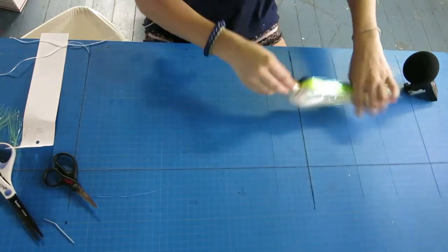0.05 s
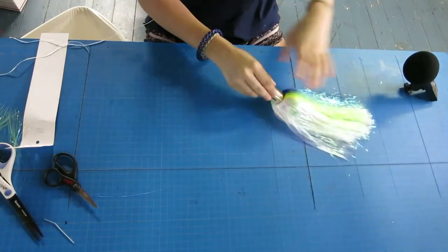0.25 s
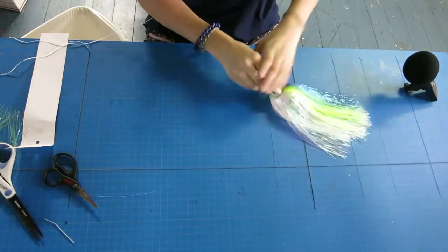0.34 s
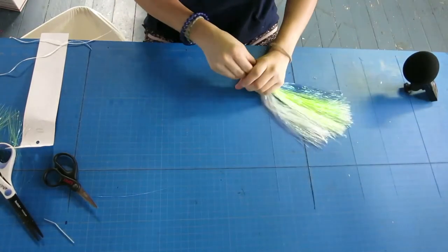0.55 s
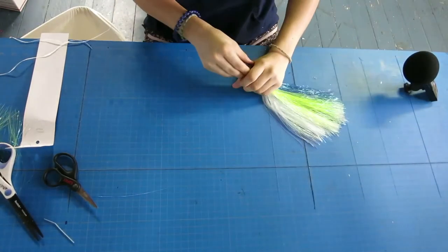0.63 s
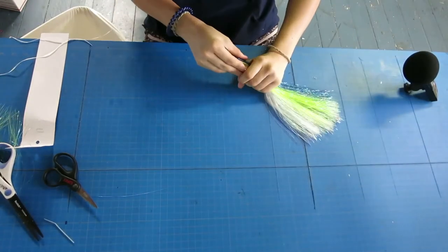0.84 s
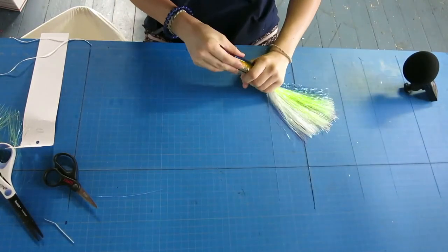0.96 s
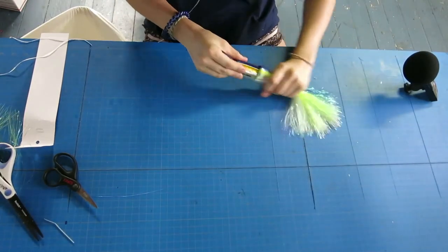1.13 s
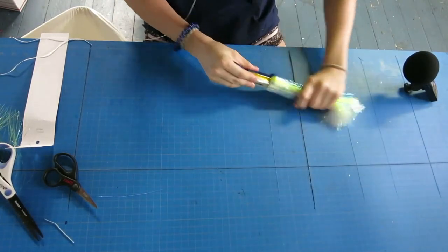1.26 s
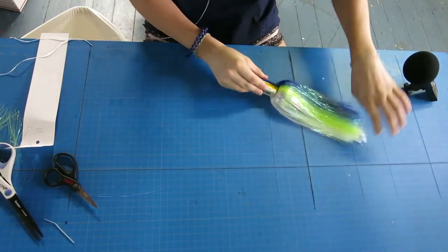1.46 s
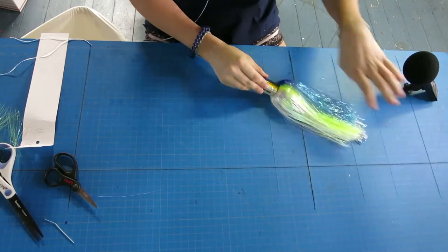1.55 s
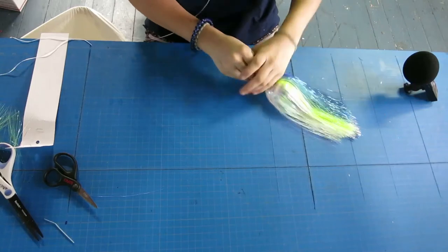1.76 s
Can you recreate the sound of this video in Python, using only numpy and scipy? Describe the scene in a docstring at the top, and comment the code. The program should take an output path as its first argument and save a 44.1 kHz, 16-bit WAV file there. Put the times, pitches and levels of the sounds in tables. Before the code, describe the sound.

Tinsel rustling softly in the hands, with one thump on a table early on.

```python
"""Over the hum of a quiet room, a bundle of tinsel hisses as it is swung down onto a cutting mat.
At 0.2 s the hand lands: the stem clacks and one dull thump excites the normal modes of the table.
The bundle is then stroked, and countless tiny strand contacts add up to hiss and crackle,
while a few ticks snap between the fingers and light knocks ring the table again.
The rustle swells from 1.2 s, and near 1.45 s the bundle flops back onto the mat."""
import sys
import numpy as np
from scipy import signal
from scipy.fft import rfft, irfft
from scipy.io import wavfile

SR = 44100
rng = np.random.default_rng(int(sys.argv[2]) if len(sys.argv) > 2 else 0)


def wav_record(signal):
    """Record a signal, one row per channel, as 16-bit PCM in the file named by sys.argv[1]."""
    frames = np.transpose(np.atleast_2d(signal))
    bounded = np.clip(frames, -1, 1)
    # unit amplitude maps onto the largest positive 16-bit level
    quanta = np.round(bounded * 32767).astype(np.int16)
    wavfile.write(sys.argv[1], SR, quanta)


N = 79380
T, HZ = np.arange(N) / SR, np.fft.rfftfreq(N, 1 / SR)


def amp(db):
    """Amplitude ratio of a level in decibels."""
    return 10 ** (np.asarray(db) / 20)

def unit(x):
    """Normalisation to unit rms."""
    return x / np.sqrt(np.mean(x ** 2) + 1e-20)

def over_hz(points):
    """Interpolation of a spectrum on a logarithmic frequency axis."""
    f, value = np.transpose(points)
    return np.interp(np.log(HZ + 1), np.log(f + 1), value)

def pan(db):
    """Intensity panning: two gains from the left-minus-right level."""
    return amp(np.array([np.atleast_1d(db), -np.atleast_1d(db)]) / 2)

def pair(a, b, correlation):
    """Partial coherence: two independent spectra mix into a correlated pair."""
    c = np.clip(correlation, -1, 1)
    return np.array([a, c * a + np.sqrt(1 - c ** 2) * b])

def ring(start, hz, t60, rise, lag=0):
    """Damped oscillation of one struck mode; the phase lag is in cycles."""
    t = np.maximum(T - start, 0)
    envelope = (1 - np.exp(-t / rise)) * np.exp(-np.log(1000) * t / t60)
    return envelope * np.sin(2 * np.pi * (hz * t - lag))


# air noise spectrum: f/Hz, relative level/dB
AIR_SPECTRUM = [(15, 2), (35, -4.5), (55, 4), (80, -3), (125, -3), (160, -13), (225, -6.5), (290, -14),
                (400, -15.5), (600, -17.5), (850, -22), (1150, -22), (1700, -29.5), (4000, -37.5),
                (8000, -51.5), (16000, -66.5)]
# its balance: f/Hz, left minus right/dB
AIR_BALANCE = [(40, 3), (90, 1.5), (200, -2), (600, -4), (1200, -4.5), (2500, -1), (8000, -0.5)]
# its coherence: f/Hz, left-right correlation/1
AIR_CORRELATION = [(60, -0.087), (130, 0.42), (1400, 0.26), (3100, 0.67), (7000, 0.26), (15000, -0.84)]

def room_tone():
    """Stationary air noise plus a low hum under slow random amplitude and phase modulation."""
    hum_hz = 56.5
    a, b, drift = rfft(rng.standard_normal((3, N)))
    spectra = pair(a, b, over_hz(AIR_CORRELATION)) * amp(over_hz(AIR_SPECTRUM))
    air = unit(irfft(spectra * pan(over_hz(AIR_BALANCE)), N))
    waver = .22 * unit(irfft(drift * np.exp(-(HZ / 5) ** 2), N))
    hum = np.sqrt(2) * (1 + waver) * np.sin(2 * np.pi * hum_hz * T + waver[::-1])
    return amp(-43) * air + hum * amp([[-46], [-54]])

def reverberation(x, db, t60):
    """Convolution with sparse, exponentially decaying room reflections."""
    t, first_delay_s = T[:SR // 3], .0019
    taps = rng.standard_normal((2, len(t))) * (rng.random((2, len(t))) < .05)
    taps *= (t > first_delay_s) * np.exp(-np.log(1000) * t / t60)
    taps /= np.linalg.norm(taps, axis=1, keepdims=True)
    return amp(db) * signal.fftconvolve(x, taps, axes=1)[:, :N]


# normal modes of the table: f/Hz, left level/dB, right level/dB, T60/s, right lag/cycles
TABLE_MODES = [(61.3, -13, -17, 0.35, 0.553), (94, -5.5, -5, 0.11, 0.4), (130.2, -15.5, -8, 0.13, 1),
               (164, -12, -4.5, 0.045, 0.18), (184.7, -12, -8, 0.095, 0.14), (221.7, -8, 4.5, 0.081, 0.12),
               (256, -18.5, -14, 0.14, 0.15), (311, -14, -13.5, 0.11, 0.22),
               (349.4, -22.5, -1.5, 0.046, 0.0053), (395.5, -22.5, -20.5, 0.15, 0.35),
               (476, -18.5, -12, 0.055, .1), (654.4, -24.5, -20.5, .065, 0.16),
               (730, -25.5, -27, 0.06, 0.054), (842, -47, -33, 0.099, 0.69), (974, -49, -41, 0.086, 0.85)]
# blows on the table: t/s, level/dB, spectral roll-off/(dB per octave)
TABLE_BLOWS = [(0.2071, 3, 1.5), (0.756, -36, -7), (.789, -35, -4), (0.949, -30.5, 6.5), (.973, -32, 8.5),
               (1.451, -25, 2.5), (1.462, -25.5, -4)]

def table_thumps():
    """Modal superposition: each blow excites every mode, and the low ones build up more slowly."""
    pivot_hz, rise_cycles = 225, 1.3
    out = np.zeros((2, N))
    for start, db, rolloff in TABLE_BLOWS:
        for hz, left_db, right_db, t60, lag in TABLE_MODES:
            gain = -amp(db - rolloff * np.log2(hz / pivot_hz))
            rise = rise_cycles / hz
            out[0] += gain * amp(left_db) * ring(start, hz, t60, rise, -lag)
            out[1] += gain * amp(right_db) * ring(start, hz, t60, rise)
    return out


# phase between the two sides: f/Hz, right lead/rad
RIGHT_LEAD = [(100, 0.5), (2000, 0.33), (5500, 0.89), (8000, 1.5), (11500, 2.08), (15000, 1)]

def arrival(spectra):
    """Path difference: the spectra become waves that reach the right side slightly first."""
    return irfft(spectra * np.exp(1j * np.array([[0], [1]]) * over_hz(RIGHT_LEAD)), N)


# modes of the stem striking the mat: f/Hz, relative level/dB, T60/s
STEM_MODES = [(1540, -6.5, 0.02), (2295, -1.5, 0.022), (2420, 4.5, 0.0054), (2700, -20, 0.042),
              (3100, -12, 0.016), (3680, -22.5, 0.048), (4160, -22, .03)]

def stem_clack():
    """Impact excitation: a hard contact rings high, quickly damped modes."""
    clack = sum(amp(db - 23.5) * ring(.2137, hz, t60, rise=.00024) for hz, db, t60 in STEM_MODES)
    return arrival(rfft(clack * pan(db=4)))

def snap(start, hz):
    """Impulsive radiation: one sharp pressure pulse with a very short, lower ring."""
    u = (np.pi * hz * (T - start)) ** 2
    pulse = (2 * u - 1) * np.exp(-u)
    return pulse + amp(-12) * ring(start, hz * .82, t60=.0088, rise=.0001)


# snaps between the fingers: t/s, level/dB, f/Hz
FINGER_SNAPS = [(0.2062, -22.5, 3970), (0.5533, -20.5, 3060), (.5531, -33, 1320), (0.758, -38.5, 1020),
                (0.9726, -38.5, 1040)]
# their echoes: delay/s, relative level/dB
SNAP_ECHOES = [(.0067, -19), (.0145, -23)]

def finger_ticks():
    """Early reflection: nearby surfaces return delayed, weaker copies of each snap."""
    direct = sum(amp(db) * snap(start, hz) for start, db, hz in FINGER_SNAPS)
    echoes = sum(amp(db + echo_db) * snap(start + delay, hz)
                 for start, db, hz in FINGER_SNAPS for delay, echo_db in SNAP_ECHOES)
    return arrival(rfft((direct + echoes) * pan(db=-2)))

def crackle(spectrum, correlation):
    """Shot noise: thousands of tiny strand contacts of uneven size over a smooth hiss."""
    contacts_per_s, spread_db, power_share = 9000, 5.5, .29
    size = amp(spread_db * np.minimum(rng.exponential(1, (2, N)), 5))
    sign = rng.choice([-1, 1], (2, N))
    contacts = unit(size * sign * (rng.random((2, N)) < contacts_per_s / SR))
    hiss = rng.standard_normal((2, N))
    a, b = rfft(np.sqrt(power_share) * contacts + np.sqrt(1 - power_share) * hiss)
    return unit(arrival(pair(a, b, correlation) * amp(over_hz(spectrum))))

def swell(peak_s, db, rise, fall, side_db):
    """Asymmetric Gaussian envelope of one movement, left and right."""
    width = np.where(T < peak_s, rise, fall)
    return amp(db) * pan(side_db) * np.exp(-((T - peak_s) / width) ** 2 / 2)


# crunches in the hand or on the mat: t/s, level/dB, rise/s, fall/s, left minus right/dB, f ratio/1
CRUNCH_BURSTS = [(0.9716, -44, 0.0011, 0.00094, -1.5, 1.55), (1.194, -45, 0.015, 0.021, -1.5, 1.43),
                 (1.475, -46, 0.012, 0.0082, 7.5, 0.984)]
# their spectrum at ratio 1: f/Hz, relative level/dB
CRUNCH_SPECTRUM = [(300, -16), (1000, -5), (1500, -16), (1750, 0.5), (2050, -2), (2350, -1), (2850, -4),
                   (3300, -17), (4300, -13), (6000, -25), (16000, -50)]

def crunches():
    """Brief bursts of shot noise, each with its spectrum scaled in frequency."""
    return sum(swell(*shape) * crackle([(hz * ratio, db) for hz, db in CRUNCH_SPECTRUM], correlation=.85)
               for *shape, ratio in CRUNCH_BURSTS)


# strokes of the hand: t/s, level/dB, rise/s, fall/s, left minus right/dB
HAND_STROKES = [(.1, -64, 0.086, 0.15, -2), (.65, -63.5, 0.13, 0.16, 1), (1.2, -49.5, 0.079, 0.14, -1),
                (1.32, -51.5, 0.073, 0.052, 2), (1.47, -50.5, 0.04, 0.033, 3)]
# their spectrum: f/Hz, relative level/dB
STROKE_SPECTRUM = [(200, 6), (600, 0.5), (1200, -1), (2000, -3), (2800, -0.5), (3700, -2.5), (5000, -3.5),
                   (7000, -9.5), (10000, -11), (16000, -96)]

def strokes():
    """Friction noise: strands squeezed through the hand rustle darkly; overlapping strokes add in power."""
    power = sum(swell(*stroke) ** 2 for stroke in HAND_STROKES)
    return crackle(STROKE_SPECTRUM, correlation=.85) * np.sqrt(power)


# envelope of the sliding strands: t/s, level/dB
SLIDE_LEVEL = [(0, -55.5), (.09, -48.5), (.135, -48), (.17, -61.5), (.182, -45), (.208, -44), (.23, -56.5),
               (.27, -63), (.4, -65.5), (.48, -59.5), (.61, -60.5), (.66, -58), (.7, -63.5), (.8, -64.5),
               (.87, -72), (.99, -60.5), (1.065, -70.5), (1.085, -57.5), (1.145, -56), (1.18, -47.5),
               (1.23, -49.5), (1.28, -53.5), (1.42, -57), (1.485, -51), (1.525, -61), (1.575, -56),
               (1.625, -70.5), (1.8, -68.5)]
# their spectrum: f/Hz, relative level/dB
SLIDE_SPECTRUM = [(500, -13), (1500, -6.5), (3000, -5.5), (5000, 1), (7000, -0.5), (8500, -2),
                  (11000, -0.5), (13500, -6), (16000, -12)]
# their balance: t/s, left minus right/dB
SLIDE_BALANCE = [(0, 0), (.18, 2.5), (.3, 1), (1.2, 0.5), (1.5, 3.5), (1.8, -1)]

def loose_strands():
    """Sliding friction between loose strands: a bright fizz that follows the motion of the bundle."""
    envelope = amp(np.interp(T, *np.transpose(SLIDE_LEVEL)))
    balance = pan(np.interp(T, *np.transpose(SLIDE_BALANCE)))
    return crackle(SLIDE_SPECTRUM, correlation=.7) * envelope * balance

def scene():
    """Superposition of all sources; the room holds the low thumps longer than the clicks."""
    tinsel = loose_strands() + strokes() + crunches()
    clicks, thumps = stem_clack() + finger_ticks(), table_thumps()
    room = reverberation(clicks, db=-16.5, t60=.16) + room_tone()
    room += reverberation(thumps, db=-17.5, t60=.31)
    return room + thumps + clicks + tinsel

def record(dry):
    """Soft saturation rounds the peak of the thump; a low-pass filter then limits the band."""
    ceiling, cutoff_hz = 1.05, 15850
    rounded = dry / (1 + (dry / ceiling) ** 8) ** (1 / 8)
    lowpass = signal.firwin(511, cutoff_hz, window=("kaiser", 9), fs=SR)
    return signal.oaconvolve(rounded, lowpass[None], "same")


dry = scene()
out = record(dry)
wav_record(out)
```